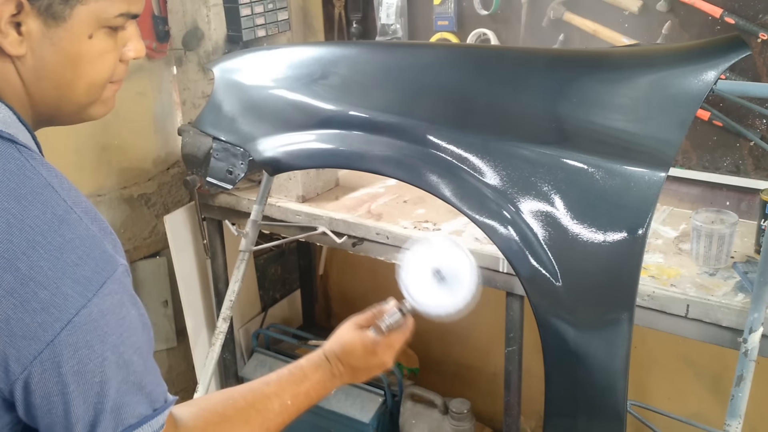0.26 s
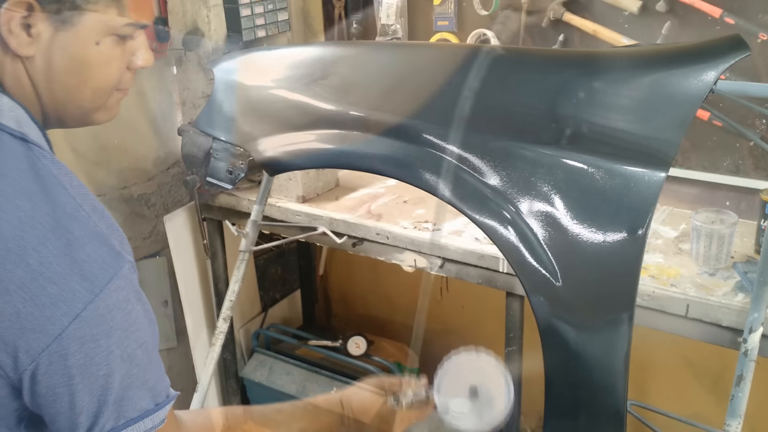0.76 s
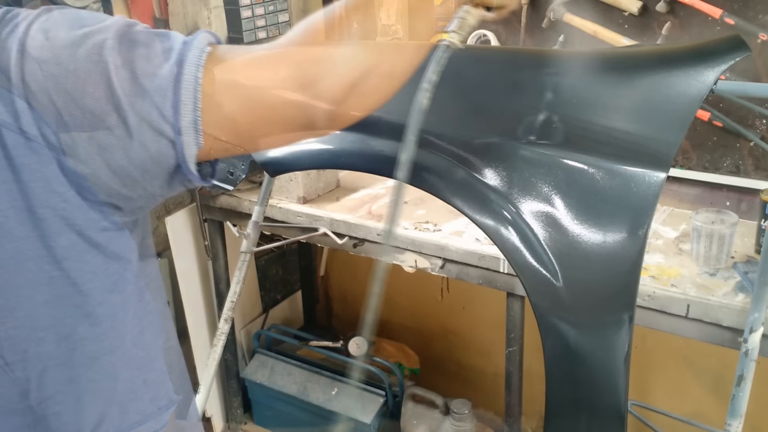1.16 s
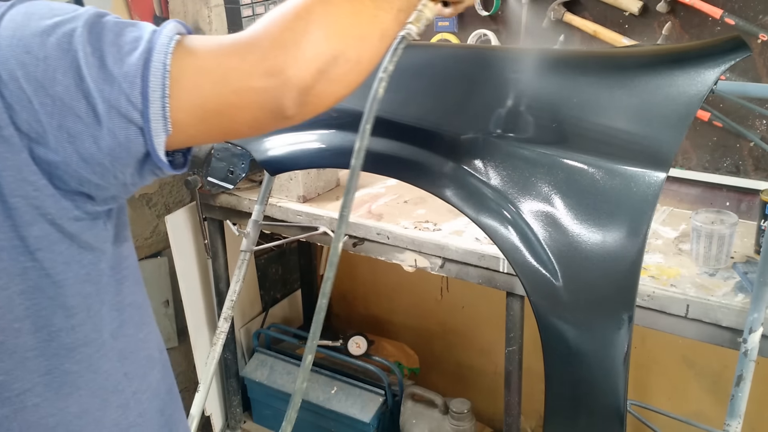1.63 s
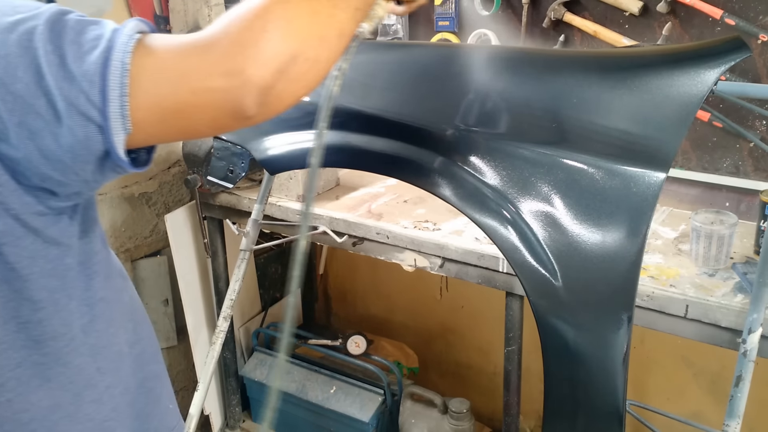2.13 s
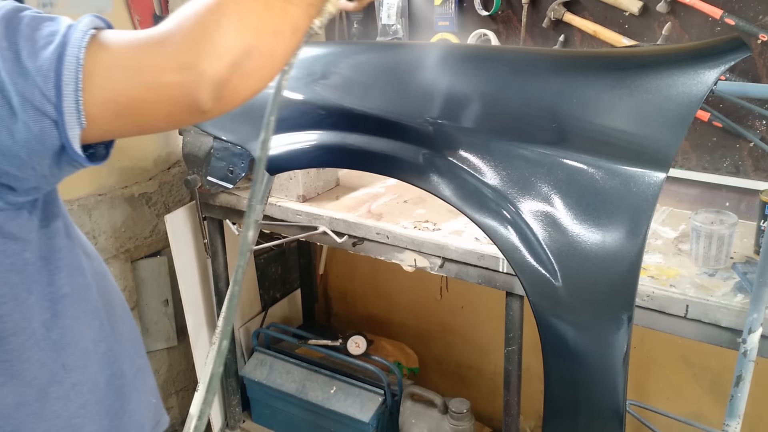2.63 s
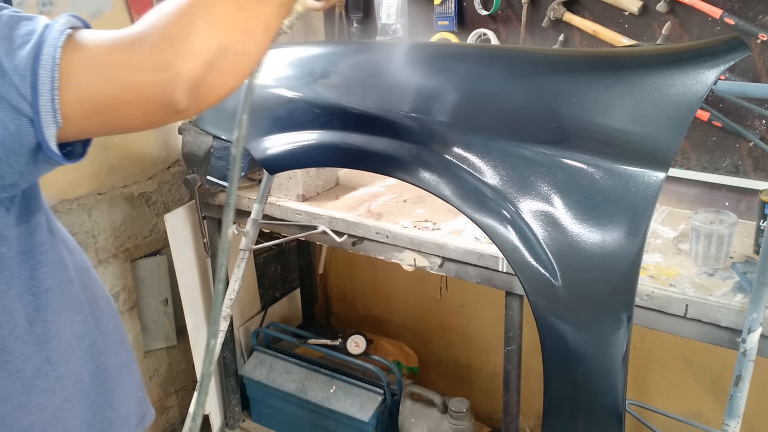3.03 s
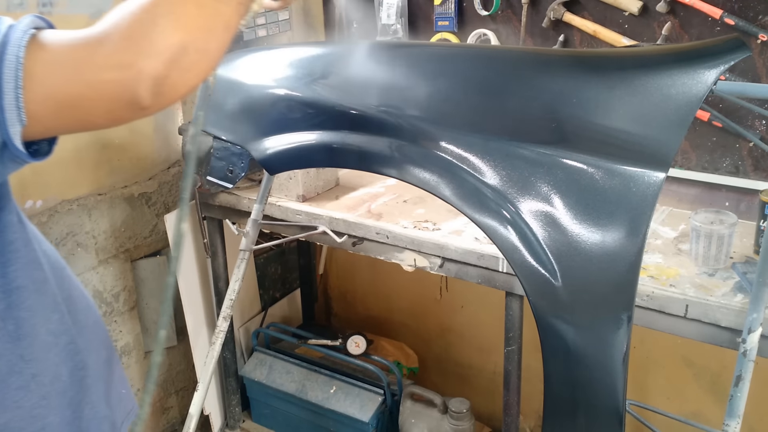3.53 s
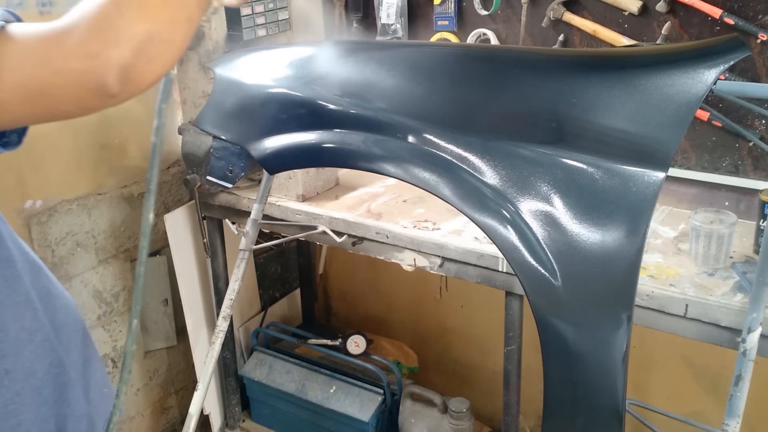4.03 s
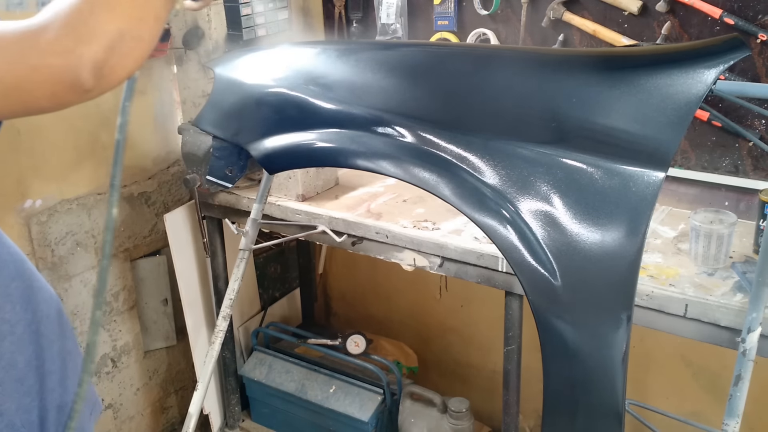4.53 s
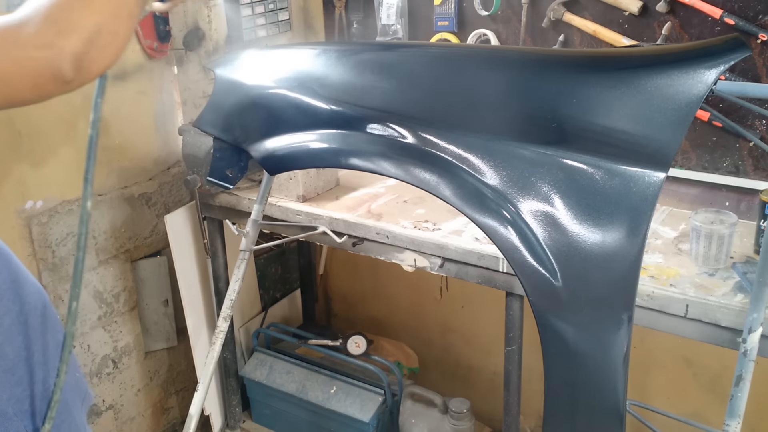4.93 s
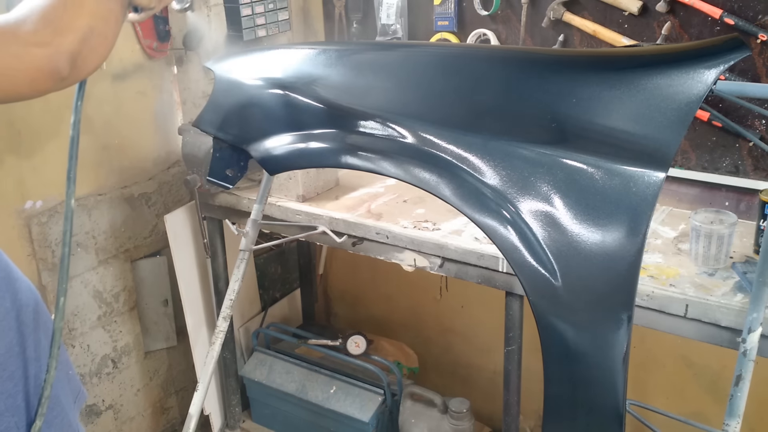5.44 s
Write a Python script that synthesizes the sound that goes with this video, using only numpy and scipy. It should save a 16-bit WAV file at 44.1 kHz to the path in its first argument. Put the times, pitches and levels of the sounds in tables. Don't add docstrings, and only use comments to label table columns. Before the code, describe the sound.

A small piston compressor runs from start to end in a workshop, about twenty-nine strokes a second, so the blows fuse into a coarse, throbbing motor buzz. Under it is a steady low hum; over it, hollow metal body ringing mostly between 300 and 1100 Hz, a faint sheet-guard rattle, broad rushing air and thin whistling near 5 kHz. A spray gun hisses softly at first, swells from 0.6 to 1.2 seconds and is strongest around 2.25, then thins gradually to the end, its image drifting slowly from one side to the other. Around 1.0 the compressor's upper ring dulls briefly, then the low boom swells near 1.2. Uneven strokes dip or kick, notably at 0.7, 2.3, 2.7, 3.2 and 4.9. Low draught puffs buffet the phone's two microphones near 0.4, 2.3, 3.5 and 4.25. The hiss sounds slightly combed, with the extreme top cut off.

```python
import sys
import numpy as np
from scipy import signal
from scipy.fft import rfft, irfft
from scipy.io import wavfile
from scipy.ndimage import uniform_filter1d, map_coordinates

SR = 44100
rng = np.random.default_rng(int(sys.argv[2]) if len(sys.argv) > 2 else 0)


def log_audio(samples):
    frames = np.atleast_2d(samples).T
    limited = np.clip(frames, -1, 1)
    pcm = np.round(limited * 32767).astype(np.int16)
    wavfile.write(sys.argv[1], SR, pcm)


def amplitude_ratio(level_db):
    exponent = np.asarray(level_db, float) / 20
    return 10 ** exponent


N = 250929
TIME = np.arange(N) / SR
FREQ = np.maximum(np.arange(N // 2 + 1) * SR / N, 1)

STROKE_HZ = 28.875
SHAFT_LEAD = [(0, 0), (1.2, .022), (2.1, .03), (2.25, .022), (2.35, .042), (2.7, .03), (2.85, .052),
              (3.15, .047), (3.3, .053), (4.5, .048), (5.2, .048), (5.3, .062), (5.69, .064)]
# stroke_multiple, common_db, apart_db
BODY_RINGS = [(11.77, -37, -40), (13.03, -33.5, -63), (13.33, -39, -38), (15.77, -42, -49),
              (16.78, -42, -65), (16.97, -52.5, -45), (17.1, -41, -69), (19.1, -41.5, -44),
              (18.9, -52.5, -71), (21.82, -45.5, -55), (22.3, -66.5, -62), (23.23, -44.5, -46),
              (22.95, -37, -47.5), (24.82, -37, -63), (25.55, -45, -61), (27.7, -59, -69),
              (28.17, -38.5, -62), (28.885, -38, -70), (29.6, -78.5, -77), (31.83, -45.5, -77),
              (31.2, -45.5, -59), (32.64, -47, -57), (35, -106, -56), (36.66, -53.5, -55),
              (36.74, -43.5, -65), (37, -42, -65), (37.4, -49.5, -66), (38.9, -50, -47)]
APART_LAG_RAD = 0.56
RING_ARRIVAL = [(11.5, .45), (16.5, -.52), (17.5, -.15), (22.5, -.15), (23.5, .42), (24.5, .15), (28, -.03),
                (38, .1)]
# pitch_hz, width_hz, level_db
GUARD_RINGS = [(1501, 61, -44.5), (1683, 85, -53.5), (1060, 65, -45)]
# centre_s, length_s, knock_loss_db, upper_ring_loss_db
WEAK_STROKES = [(0, 0.02, -2, -9), (0.602, 0.017, 2.5, 7.5), (1.75, 0.035, 3, 4.5), (2.29, 0.047, 6, 2.5),
                (2.75, 0.055, 5, 5.5), (3.203, 0.019, 11.5, 8), (4.386, .05, 1.5, -2), (4.606, .05, 2, -1),
                (4.83, .06, 3.5, -0.5), (5.04, 0.04, 4, -0.5), (5.27, 0.027, 3.5, 6.5), (5.59, .05, 3, -1)]
# centre_s, length_s, knock_gain_db
HARD_STROKES = [
    (0.697, 0.019, 5.5),
    (2.26, 0.033, 7),
    (2.69, 0.048, 4),
    (3.175, .04, 5),
    (4.894, 0.017, 6.5),
]
UNEVEN_DB, UNEVEN_PER_S = 0.46, 23
UPPER_DIP_S, UPPER_DIP_LENGTH_S, UPPER_DIP_DB, RUSH_DIP_DB = 1.04, 0.14, -8, -1
BOOM_S, BOOM_LENGTH_S, BOOM_HUM_DB, BOOM_KNOCK_DB = 1.2, 0.28, 3, 2
MUFFLE_HZ, MUFFLE_WIDTH_HZ, MUFFLE_SHARE, MUFFLE_UNTIL_S = 550, 160, 0.36, 1.15
# stroke_multiple, common_db, apart_db
SHAFT_HUM = [(1, -47, -76), (2, -52.5, -84), (3, -68.5, -78), (4, -46.5, -77), (5, -40.5, -70),
             (6, -44.5, -78), (7, -63, -66.5), (8, -41.5, -122), (9, -47.5, -103), (10, -45.5, -57),
             (11, -45.5, -122)]
# pitch_hz, level_db (per Hz)
AIR_RUSH = [(60, -13.5), (200, -11), (400, 1), (750, 0.5), (1000, -9), (1250, -9.5), (1600, -5.5),
            (2000, -9), (2500, -12), (4000, -8.5), (5500, -6.5), (8300, -5.5), (11000, -8), (15500, -9)]
# pitch_hz, apart_minus_common_db
AIR_APART = [(100, -12), (400, -10), (1000, 1.5), (1800, 1), (16000, -1)]
RUSH_DB, RUSH_THROB = -25, 0.084
# pitch_hz, width_hz, level_db
VALVE_WHISTLES = [(3303, 77, -47), (3804, 230, -44), (4207, 140, -42.5), (4840, 220, -41),
                  (5020, 260, -35.5), (5164, 130, -33)]
# start_s, jet_db, left_lag_ms
GUN_SWEEP = [(0, -30, 0.14), (.6, -29, 0.12), (.9, -24, 0.096), (1.15, -21.5, 0.09), (1.6, -21.5, 0.075),
             (2.25, -20.5, 0.051), (2.6, -23, 0.037), (3.3, -25, 0.016), (3.9, -26.5, -0.015),
             (4.5, -28, -0.029), (5.1, -29, -.06), (5.69, -31, -0.062)]
# pitch_hz, level_db (per Hz)
JET_HISS = [(1500, -18.5), (3000, -10.5), (6000, -0.5), (8500, 3), (11000, -1.5), (13000, 1), (15500, -0.5)]
# start_s, level_db
PORT_DRAUGHT = [(0, -51), (.7, -50), (1.15, -57), (1.75, -80), (2.3, -61), (3.5, -61), (4.5, -56),
                (5.0, -62), (5.69, -67)]
# centre_s, gain_db (above the draught)
PORT_GUSTS = [
    (.37, 8),
    (.62, 2),
    (2.32, 9),
    (3.15, 6),
    (3.52, 12),
    (4.25, 9),
    (4.7, 4),
]
GUST_S = 0.054
# pitch_hz, level_db (per Hz)
PORT_BUFFET = [(10, -4), (30, -2.5), (60, -3), (100, -1.5), (160, -11), (300, -39), (600, -60)]
# pitch_hz, right_capsule_db, subtracted_from_left_db, subtracted_from_right_db
PHONE_RESPONSE = [(99, 0, 2.5, -2.5), (3840, -6, 4.5, 2.5), (5520, -6, -11, -3.5), (7000, -1.5, -3, -10.5),
                  (8500, -4.5, -34, -8.5), (11500, -4.5, -32, -13), (16100, -4.5, -26, -20)]
PORT_MS = 0.3792
LIFT_FROM_HZ, LIFT_TO_HZ, TOP_HZ = 600, 60, 15480


def curve(table, column):
    return np.interp(TIME, *np.transpose(table)[[0, column]])


def gain(table, column):
    hz, db = np.transpose(table)[[0, column]]
    return amplitude_ratio(np.interp(np.log(FREQ), np.log(hz), db))


def ring(hz, width):
    return 1 / (1 + 1j * (FREQ / hz - hz / FREQ) * hz / width)


def unit(x):
    return x / np.sqrt(np.mean(x ** 2))


def noise(shape):
    return unit(irfft(rfft(rng.standard_normal(N)) * shape, N))


def walk(rate):
    hold = int(SR / rate)
    steps = np.repeat(rng.standard_normal(N // hold + 1), hold)
    return uniform_filter1d(uniform_filter1d(steps, hold), hold)[:N]


def bump(at, length):
    return np.exp(-((TIME - at) / length) ** 2)


def capsules(common, apart):
    return np.array([common + apart, common - apart])


def effort():
    uneven = UNEVEN_DB * walk(UNEVEN_PER_S)
    low = sum(db * bump(s, length) for s, length, db in HARD_STROKES)
    low = low - sum(db * bump(s, length) for s, length, db, _ in WEAK_STROKES)
    low = low + BOOM_KNOCK_DB * bump(BOOM_S, BOOM_LENGTH_S)
    high = UPPER_DIP_DB * bump(UPPER_DIP_S, UPPER_DIP_LENGTH_S)
    high = high - sum(db * bump(s, length) for s, length, _, db in WEAK_STROKES)
    return low + uneven, high + uneven


def strokes(turn):
    late = 0.98
    at = np.flatnonzero(np.diff(np.floor(turn - late)))
    chance = rng.standard_normal((len(at), 2))
    slip = (chance[:, 0] * 0.04 * SR / 1000).astype(int)
    blows = np.zeros(N)
    blows[np.clip(at + slip, 0, N - 1)] = amplitude_ratio(0.35 * chance[:, 1]) * SR / STROKE_HZ / np.sqrt(2)
    puff = unit(np.exp(-((turn - late) % 1) / 0.94) * rng.standard_normal(N))
    return blows, puff


def body_ring(push):
    multiple, common_db, apart_db = np.transpose(BODY_RINGS)
    order = FREQ / STROKE_HZ
    edge = np.clip(order - multiple[0] + 1, 0, 1) * np.clip(multiple[-1] + 1 - order, 0, 1)
    arrival = np.interp(order, *np.transpose(RING_ARRIVAL))
    arrival_phase = 2 * np.pi * np.cumsum(arrival) * SR / N / STROKE_HZ
    out = []
    for db, lag, smear in ((common_db, 0, 0.03), (apart_db, APART_LAG_RAD, 0.09)):
        delay = smear * rng.standard_normal(len(multiple))
        phase = np.interp(order, multiple, 2 * np.pi * np.cumsum(delay)) + arrival_phase
        level = edge * amplitude_ratio(np.interp(order, multiple, db))
        out.append(irfft(push * level * np.exp(-1j * (phase + lag)), N))
    return capsules(*out)


def guard_clank(blows, puff, high_db):
    shake = rfft(0.5 * unit(blows) + puff)
    clank = sum(amplitude_ratio(db) * unit(irfft(shake * ring(hz, width) ** 2, N)) for hz, width, db in GUARD_RINGS)
    clank = amplitude_ratio(high_db / 2) * clank
    return capsules(clank, 0.19 * np.roll(clank, 40))


def knock(turn):
    blows, puff = strokes(turn)
    drive = blows + 0.13 * puff * np.sqrt(np.mean(blows ** 2))
    low_db, high_db = effort()
    upper = np.clip((FREQ - 560) / 80, 0, 1)
    low_push = rfft(drive * amplitude_ratio(low_db - low_db.mean())) * (1 - upper)
    high_push = rfft(drive * amplitude_ratio(high_db - high_db.mean())) * upper
    before = np.clip((MUFFLE_UNTIL_S - TIME) / 0.2, 0, 1)
    muffled = MUFFLE_SHARE * rfft(drive * before) * abs(ring(MUFFLE_HZ, MUFFLE_WIDTH_HZ)) ** 2
    return body_ring(low_push + high_push - muffled) + guard_clank(blows, puff, high_db)


def hum(turn):
    late, spread = 0.1147, 0.048
    common, apart = 0, 0
    for k, common_db, apart_db in SHAFT_HUM:
        tone = np.sqrt(2) * np.exp(2j * np.pi * k * (turn - late) - 1j * spread * k * k)
        common = common + amplitude_ratio(common_db) * tone.real
        apart = apart + amplitude_ratio(apart_db) * (0.5 * tone.real + tone.imag)
    return capsules(common, apart) * amplitude_ratio(BOOM_HUM_DB * bump(BOOM_S, BOOM_LENGTH_S))


def gun():
    jet = noise(gain(JET_HISS, 1)) * amplitude_ratio(curve(GUN_SWEEP, 1) + 0.21 * walk(30))
    half_lag = curve(GUN_SWEEP, 2) * SR / 2000
    places = [np.arange(N) - side * half_lag for side in (1, -1)]
    return np.array([map_coordinates(jet, [place], order=5, mode="nearest") for place in places])


def rush(turn):
    colour = gain(AIR_RUSH, 1)
    apart_colour = colour * gain(AIR_APART, 1)
    scale = np.sqrt(np.mean(apart_colour ** 2) / np.mean(colour ** 2))
    air = amplitude_ratio(RUSH_DB) * capsules(noise(colour), scale * noise(apart_colour))
    for hz, width, db in VALVE_WHISTLES:
        whistle = ring(hz, width) ** 2
        air = air + amplitude_ratio(db) * np.array([noise(whistle), noise(whistle)])
    throb = 1 + RUSH_THROB * np.cos(2 * np.pi * turn + 2.1)
    return air * throb * amplitude_ratio(0.68 * walk(23) + RUSH_DIP_DB * bump(UPPER_DIP_S, UPPER_DIP_LENGTH_S))


def draught():
    gusts = sum(db * bump(s, GUST_S) for s, db in PORT_GUSTS)
    level = amplitude_ratio(curve(PORT_DRAUGHT, 1) + gusts + 4.3 * walk(10))
    colour = gain(PORT_BUFFET, 1)
    return level * capsules(amplitude_ratio(4.0) * noise(colour), noise(colour))


def scene():
    turn = STROKE_HZ * TIME + curve(SHAFT_LEAD, 1)
    return knock(turn) + hum(turn) + gun() + rush(turn) + draught()


def top_cut(x):
    return signal.sosfilt(signal.butter(12, 16830, fs=SR, output="sos"), x)


def record(dry):
    left = rfft(dry[0])
    right = rfft(dry[1]) * gain(PHONE_RESPONSE, 1)
    late = np.exp(-2j * np.pi * FREQ * PORT_MS / 1000)
    left_side = left - gain(PHONE_RESPONSE, 2) * late * right
    right_side = right - gain(PHONE_RESPONSE, 3) * late * left
    lift = (LIFT_FROM_HZ + 1j * FREQ) / (LIFT_TO_HZ + 1j * FREQ)
    mix = irfft(np.array([left_side, right_side]) * lift * (FREQ < TOP_HZ), N)
    return top_cut(mix)


dry = scene()
out = record(dry)
log_audio(out)
```